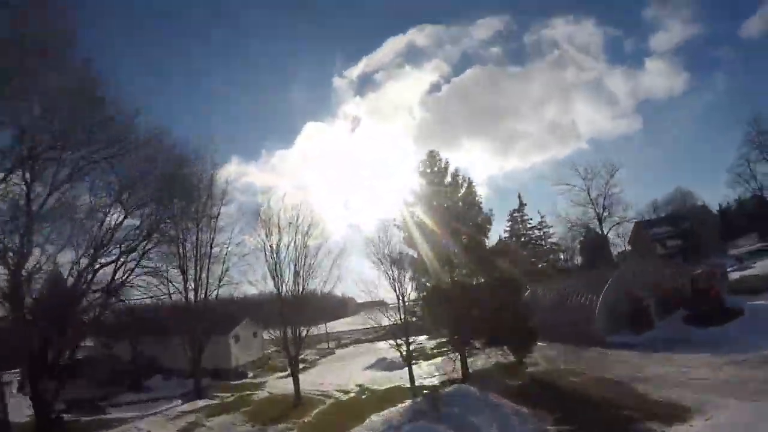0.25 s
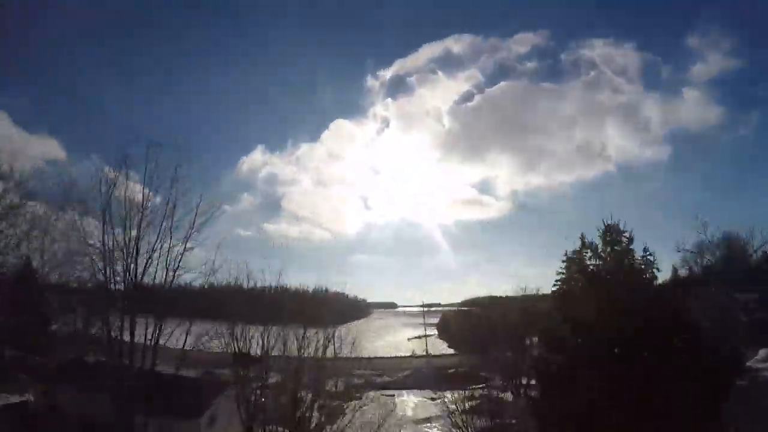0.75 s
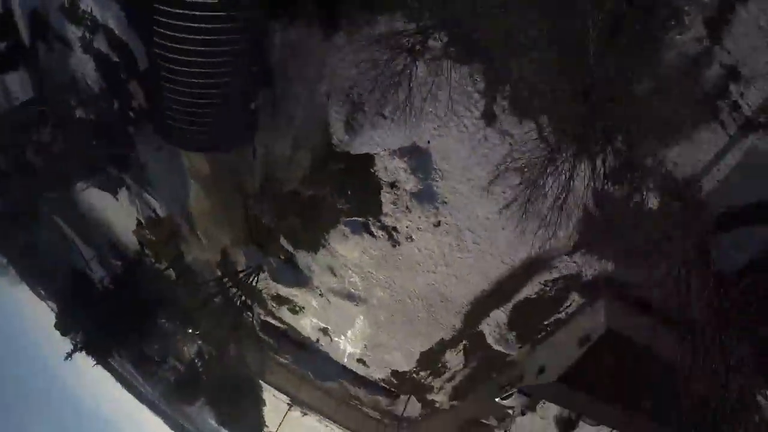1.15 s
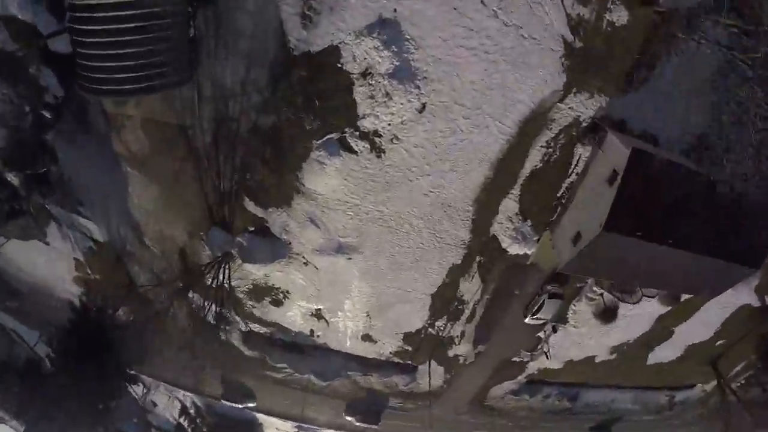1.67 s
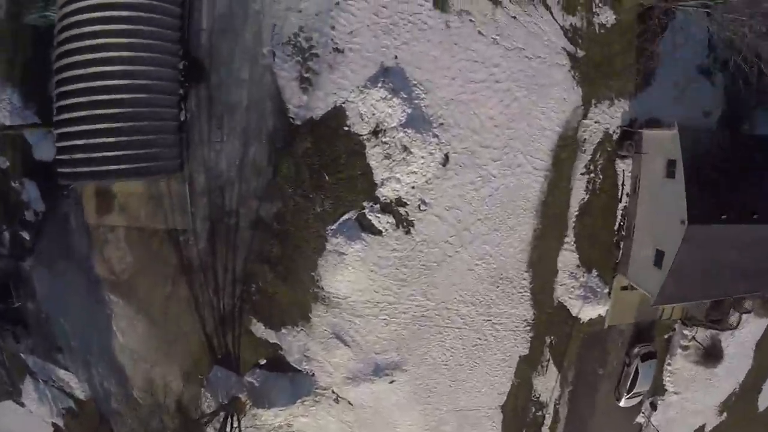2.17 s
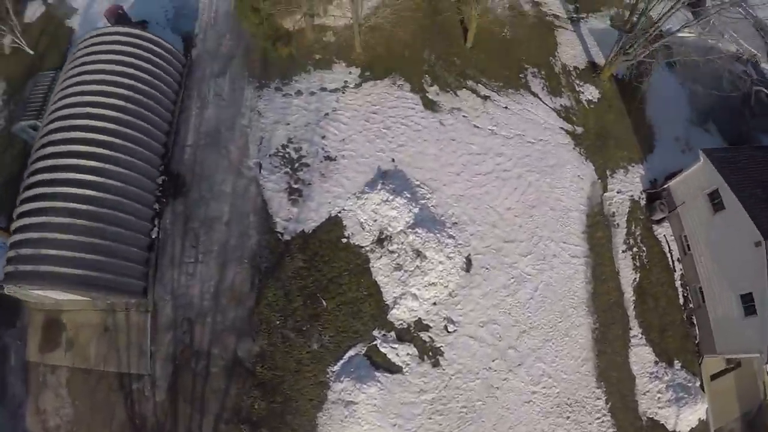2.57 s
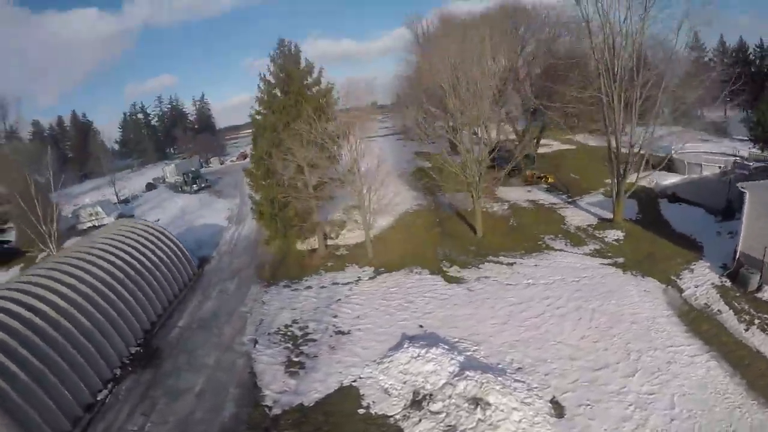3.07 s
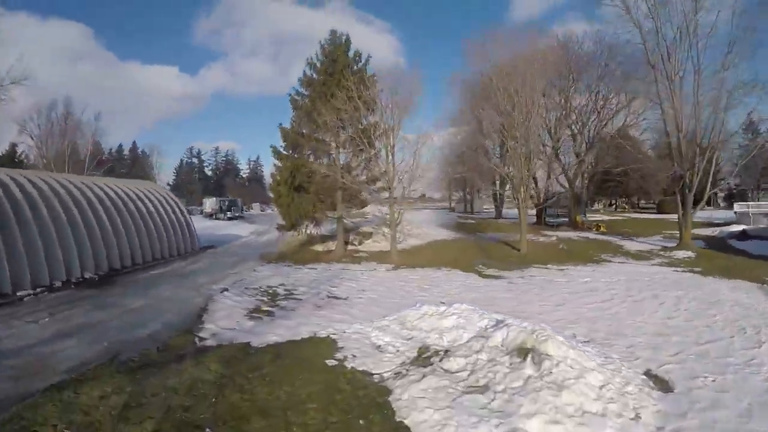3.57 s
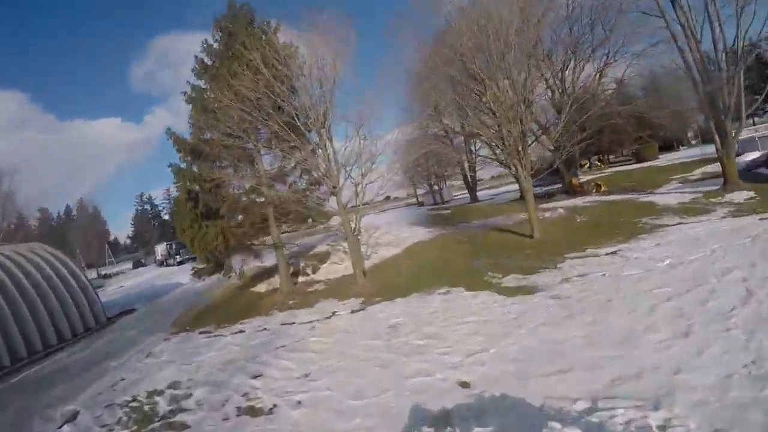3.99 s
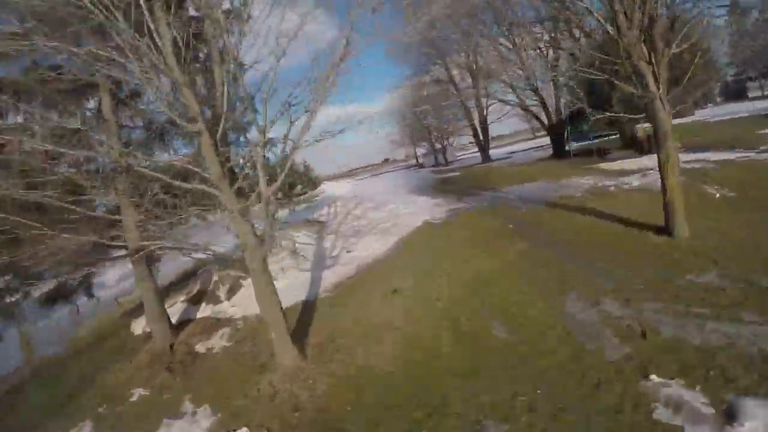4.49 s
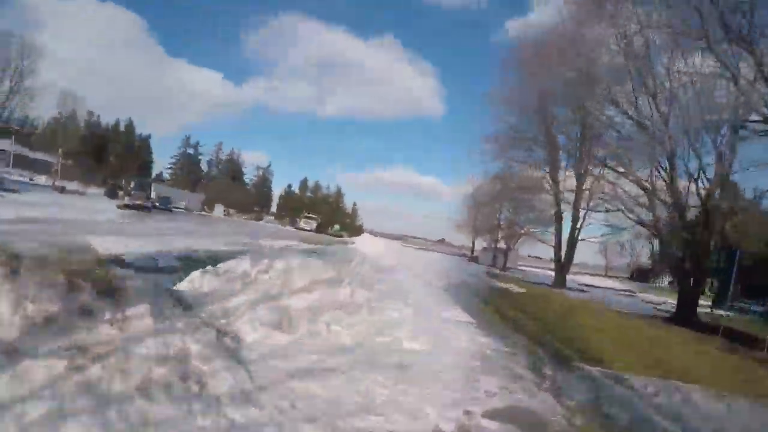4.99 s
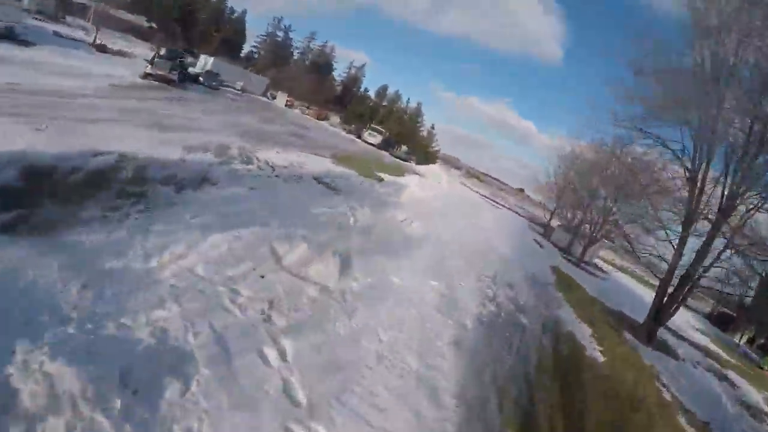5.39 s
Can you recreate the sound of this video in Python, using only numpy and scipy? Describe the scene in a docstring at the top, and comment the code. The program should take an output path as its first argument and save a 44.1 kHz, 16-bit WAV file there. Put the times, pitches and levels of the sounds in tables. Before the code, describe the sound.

A small racing drone flies outdoors, heard from a microphone riding on it. Its propellers start with a high, steady, beating whine, then drop to a low buzz while wind rumbles and slaps against the microphone. The motors climb again through the hardest gusts and a few brief crackles. The wind eases, and the whine dives, shoots back up, dips and starts rising once more.

```python
"""The propellers of a small racing drone, heard by the camera strapped to it. Each radiates harmonics of
its blade rate: two in front whine and beat against each other, a rear one sings faintly below them.
The throttle is cut for a flip and a dive, then the motors are punched down and up. Turbulent air adds
rumble, buffeting, slaps, crackles and hiss, and the loudest gusts overload the recorder."""
import sys
import numpy as np
from scipy import signal
from scipy.io import wavfile
from scipy.ndimage import uniform_filter1d

SR = 44100
rng = np.random.default_rng(int(sys.argv[2]) if len(sys.argv) > 2 else 0)


def log_audio(samples):
    """Write samples as a 16-bit WAV file to the path given in sys.argv[1]."""
    # one column per channel
    frames = np.atleast_2d(samples).T
    # limit to full scale, then quantise
    limited = np.clip(frames, -1, 1)
    pcm = np.round(limited * 32767).astype(np.int16)
    wavfile.write(sys.argv[1], SR, pcm)


N = 248900
STEP = 64  # samples between control values

# Shapes of the noise spectra: (frequency [Hz], relative spectral density [dB])
FLOOR_SPECTRUM = [(290, -31), (500, -29), (863, 3), (982, -8), (1310, 24), (2360, -25), (3190, -17),
                  (5430, -62), (7560, -37), (8980, -61), (11000, 3), (14600, -25), (15500, -51)]
RUMBLE_SPECTRUM = [(12, -15), (25, -0.5), (45, 3.5), (70, -1.5), (110, -1.5), (200, -13.5), (330, -25),
                   (600, -53), (1200, -80)]
BUFFET_SPECTRUM = [(30, -20), (80, 0), (150, 0.5), (300, -7), (600, -13.5), (1200, -26.5), (2500, -43.5),
                   (6000, -70)]
HISS_SPECTRUM = [(200, -7), (600, -0.5), (1200, -4.5), (1500, -1.5), (1800, -5), (2500, -2.5), (4200, 1.5),
                 (5000, -2), (6500, -1), (8500, -3), (11000, -5), (13000, -10.5), (15500, -12.5)]
DOWNWASH_SPECTRUM = [(90, -20), (150, 3), (230, 2), (320, -8), (420, -10.5), (700, -46)]
# Strength of the wind: (time [s], rumble [dB], buffeting [dB], turbulent hiss [dB])
WIND_LEVELS = [(0, -18, -22.5, -30.5), (.6, -17.5, -26.5, -30.5), (.85, -20, -35, -29.5),
               (1.04, -15, -22, -30), (1.07, -15, -20, -22.5), (1.15, -14.5, -15, -21),
               (1.19, -20, -14, -32.5), (1.42, -30, -12.5, -41), (1.68, -29, -19, -41.5),
               (1.9, -22.5, -19.5, -38), (2.1, -21, -19, -35), (2.2, -23, -17, -34.5),
               (2.34, -20, -15, -36), (2.5, -26, -11.5, -37.5), (2.75, -16, -14, -44), (2.8, -14, -18, -37),
               (2.84, -18.5, -13.5, -45), (2.95, -10.5, -16.5, -38), (3.03, -18, -12.5, -28),
               (3.1, -16, -12.5, -24.5), (3.2, -13, -11, -29), (3.27, -13.5, -15.5, -18.5),
               (3.36, -14.5, -16, -24.5), (3.53, -25, -23.5, -34), (3.69, -35, -52, -45),
               (3.95, -23, -38, -54), (4.06, -27, -39, -35), (4.19, -28, -37, -43.5), (4.3, -37, -40, -68),
               (4.52, -31, -40, -52), (4.67, -25.5, -27.5, -39), (4.86, -15.5, -22.5, -50),
               (5.17, -21, -26.5, -31), (5.34, -18.5, -25.5, -35.5), (5.64, -21, -21, -35)]
# Low gusts that swell the rumble: (time [s], gain [dB])
RUMBLE_GUSTS = [(0, 7.5), (0.352, 1.5), (.71, 8.5), (.77, 11), (1.38, 8), (1.96, 11), (2.092, 1), (2.46, 6),
                (2.84, 4), (3.17, 5), (4.04, 4.5), (4.38, 14), (4.48, 9), (4.619, 6), (4.729, 7),
                (4.86, 1.5), (5.2, 6), (5.42, 2.5), (5.52, -5)]
# Brightness of the buffeting: (time [s], tilt [dB/octave])
BUFFET_BRIGHTNESS = [(0, -4.5), (.7, -3.5), (1.05, 1.5), (1.3, .5), (1.7, 2.5), (2.2, 2.5), (2.6, 1),
                     (2.9, -1), (3.2, 1.5), (3.52, 4), (3.7, -5), (5.64, -0.5)]
# Single gusts striking the microphone: (time [s], envelope peak [dB], frequency [Hz])
GUST_SLAPS = [(1.124, -4.5, 458), (1.252, -14, 275), (1.333, 0.5, 334), (1.419, -4, 368), (1.464, -3, 250),
              (2.194, -9, 348), (2.276, -13, 439), (2.387, -15, 315.2), (2.588, -2.5, 464.4),
              (2.692, -13, 257), (2.817, 2, 269), (2.878, 0, 341), (2.93, -6.5, 343.7), (2.996, 0, 267),
              (3.088, -8, 262.8), (3.182, 6.5, 265.4), (3.23, -2, 249), (3.24, 0, 826), (3.267, -2.5, 293),
              (3.335, 6, 294), (3.396, -6, 248.8), (3.409, -5.5, 249.8), (3.454, -9, 876)]
# Bright bursts in the turbulence: (time [s], approximate peak [dB], duration [s])
CRACKLE_BURSTS = [(3.27, -14, 0.0084), (3.305, -9, 0.0048), (3.364, -0.5, 0.0053), (3.418, -12, 0.0063),
                  (3.4435, -20, 0.0081)]
# Response of the camera housing to the blade harmonics: (frequency [Hz], gain [dB])
HOUSING_RESPONSE = [(150, -2), (400, 0), (800, -0.5), (1100, -0.5), (1600, 0), (2200, 0), (2900, 2),
                    (3400, -4.5), (3900, 0.5), (4400, 4), (5000, 1.5), (6500, -0.5), (8000, -4)]
# Speed of the rear propeller: (time [s], blade rate over the front mean [ratio])
REAR_SPEED_RATIO = [(0, .76), (.5, .773), (.95, .862), (3.6, .8), (3.7, .83), (4.65, .81), (4.77, .77),
                    (4.95, .822), (5.1, .8), (5.35, .82), (5.65, .79)]
# Throttle of front propellers A and B: (time [s], blade rate [Hz], base tone level [dB])
THROTTLE_A = [(0, 983, -11.5), (.13, 1072, -14), (.35, 1088, -14.5), (.5, 1081, -14.5), (.64, 1088, -15),
              (.78, 1097, -14.5), (.88, 1095, -26), (.94, 1106, -20), (.98, 1087, -23.5),
              (1.035, 1170, -19), (1.085, 719.4, -24), (1.12, 461, -15), (1.2, 266.2, -30),
              (1.25, 200, -12), (1.55, 187.4, -20.5), (1.65, 159, -22.5), (1.75, 133.7, -24),
              (2.0, 114.1, -23.5), (2.15, 116, -19), (2.45, 100.9, -18.5), (2.6, 111.3, -17.5),
              (2.75, 113, -21.5), (2.88, 162, -12), (2.95, 228, -33), (3.05, 399.5, -19), (3.15, 547, -27),
              (3.25, 822, -36), (3.42, 989, -27.5), (3.48, 1042, -32), (3.54, 1053, -33.5),
              (3.6, 1055, -28), (3.66, 1033, -24), (3.72, 1041, -24.5), (3.78, 916.4, -19),
              (3.86, 734, -25.5), (3.97, 792.5, -25.5), (4.07, 641, -17.5), (4.17, 382.8, -35),
              (4.25, 235, -32.5), (4.38, 174.4, -31.5), (4.46, 197.8, -26.5), (4.55, 227, -32),
              (4.62, 719.5, -23.5), (4.66, 840.4, -19), (4.71, 884.5, -21), (4.78, 816, -20.5),
              (4.94, 1025, -16), (5.05, 906, -21.5), (5.2, 640.5, -25), (5.27, 507.2, -26),
              (5.34, 444.6, -34), (5.41, 405, -19), (5.47, 460, -20), (5.53, 551.8, -16),
              (5.58, 714, -19.5), (5.65, 790, -22.5)]
THROTTLE_B = [(0, 998, -29), (.06, 1037, -19), (.22, 1022, -17), (.35, 1019, -19), (.5, 1026, -20),
              (.64, 1050, -18.5), (.78, 1088, -21), (.88, 1078, -13.5), (.94, 1050, -14.5),
              (.97, 1021, -14.5), (.995, 1020, -15.5), (1.035, 724, -16.5), (1.085, 754, -28),
              (1.12, 819, -26), (1.16, 659, -21), (1.25, 187, -33), (3.1, 475, -67), (3.25, 761, -25),
              (3.35, 798, -36), (3.42, 868.6, -23), (3.54, 881, -24), (3.6, 954, -20), (3.66, 973, -20),
              (3.72, 989, -19), (3.81, 809, -31), (3.86, 718.5, -28.5), (3.91, 759, -25.5),
              (3.97, 782, -42), (4.17, 378.2, -34), (4.38, 174.2, -44), (4.55, 223.1, -36),
              (4.59, 437, -15), (4.62, 669, -12), (4.66, 800, -13), (4.71, 823, -13), (4.78, 773.6, -14.5),
              (4.94, 983.5, -13), (5.05, 875, -16), (5.2, 599.5, -21), (5.27, 493, -20.5),
              (5.34, 438, -17.5), (5.41, 404.4, -33), (5.47, 440.3, -23), (5.53, 517, -26.5),
              (5.58, 629, -14), (5.65, 728, -14)]
# Front harmonics, one row each from the fundamental up: (gain of A [dB], gain of B [dB])
FRONT_HARMONICS = [(0, -2), (-12, -13.5), (-13.5, -20), (-20.5, -25), (-28, -31), (-28, -37),
                   (-31.5, -34.5), (-31, -37)]
# Front timbre; lift raises all overtones, bite tilts those above the second harmonic:
# (time [s], lift of A [dB], lift of B [dB], bite [dB/octave], blade hiss at a 1000 Hz blade rate [dB])
FRONT_TIMBRE = [(0, -4, 0, 6.5, -26), (.25, -4.5, -6, 4.5, -29.5), (.5, -1, -6, 0.5, -29),
                (.64, -1, -1.5, 1.5, -29), (.8, -1.5, 5.5, 3, -27.5), (.97, 0, -3.5, -0.5, -27.5),
                (1.04, -6, 0, 0, -35.5), (1.12, -3, 5, -3, -26.5), (1.25, -5, -9, -10, -39),
                (1.45, 8, -3, -13.5, -35), (2.4, 10, -4, 2, -24), (2.9, 7, 0, -15, -29.5),
                (3.15, 2.5, -3, -4, -26), (3.25, 7, 5, -2, -26.5), (3.38, 5, 0, -11, -27.5),
                (3.48, 6.5, -4, -1, -30), (3.68, 3.5, 4, 6, -30), (3.85, -3.5, 2, 5.5, -28),
                (4.0, 5, 11, 2, -26), (4.07, -18, 0, 11, -26.5), (4.2, -11, -1, 2, -28.5),
                (4.53, -8, 2, -14, -24), (4.63, 7.5, -7, -9, -21.5), (4.78, 4, -11, -3.5, -22.5),
                (4.95, 1.5, -1.5, 3.5, -26.5), (5.1, -0.5, -14, 1, -25.5), (5.3, -3.5, -4.5, 6, -30),
                (5.5, -3, -2, -7, -22), (5.65, 4, -5, -1, -22.5)]
# Further tilt of propeller B: (time [s], bite [dB/octave])
EXTRA_BITE_B = [(0, -2), (.7, -1.5), (.95, 3), (1.04, 6), (1.15, 2), (3.5, 4), (3.75, 0), (4.5, 4),
                (4.7, 13), (4.95, 3.5), (5.15, 2), (5.65, -3)]


def gain_of(db):
    """Amplitude ratio of a level in decibels."""
    return 10 ** (np.asarray(db) / 20)


def unit_rms(x):
    """The signal normalised to unit mean power."""
    return x / np.sqrt(np.mean(x ** 2) + 1e-20)


def curves(rows, t):
    """Linear interpolation of a table's columns at the times t."""
    times, *columns = np.transpose(rows)
    return [np.interp(t, times, column) for column in columns]


def per_sample(control):
    return np.interp(np.arange(N) / STEP, np.arange(len(control)), control)


def drift(rate_hz):
    """Slow random fluctuation: low-passed noise of unit rms at the control rate."""
    lowpass = signal.butter(2, rate_hz, fs=SR / STEP)
    return unit_rms(signal.lfilter(*lowpass, rng.standard_normal(N // STEP + 2)))


def throttle(rows, t):
    """Blade rate [Hz] on a monotone cubic in log frequency, and tone level [dB] in straight lines."""
    times, hz, db = np.transpose(rows)
    gaps, pitch = np.diff(times), np.log(hz)
    chord = np.diff(pitch) / gaps
    before, after = np.append(chord[0], chord), np.append(chord, chord[-1])
    slope = np.where(before * after > 0, 2 * before * after / (before + after + 1e-12), 0)
    k = np.clip(np.searchsorted(times, t) - 1, 0, len(gaps) - 1)
    u = np.clip((t - times[k]) / gaps[k], 0, 1)
    ease = u * u * (3 - 2 * u)
    bend = gaps[k] * u * (1 - u) * ((1 - u) * slope[k] - u * slope[k + 1])
    return np.exp(pitch[k] + ease * chord[k] * gaps[k] + bend), np.interp(t, times, db)


def speed_octaves(t):
    """Blade rate of the faster front propeller, in octaves above 1000 Hz."""
    return np.log2(np.maximum(throttle(THROTTLE_A, t)[0], throttle(THROTTLE_B, t)[0]) / 1000)


def shaped_noise(spectrum, size, patchy_db, flicker_db, tilt_db=(0,), pivot_hz=1000):
    """Gaussian noise modulated by spectral patches, broadband flicker and a tilt in dB per octave."""
    hop = size // 4
    frames, hz = N // hop + 5, np.fft.rfftfreq(size, 1 / SR)
    real, imag, patches = rng.standard_normal((frames, len(hz), 3)).T
    patches = unit_rms(uniform_filter1d(uniform_filter1d(patches, size=6, axis=0), size=8, axis=1))
    flicker = unit_rms(uniform_filter1d(rng.standard_normal(frames), size=3))
    points_hz, points_db = np.transpose(spectrum)
    colour_db = np.interp(np.log(hz + 1), np.log(points_hz), points_db, left=-60, right=-120)[:, None]
    untilted = (real + 1j * imag) * gain_of(colour_db + patchy_db * patches + flicker_db * flicker)
    octaves = np.log2(np.maximum(hz[:, None] / pivot_hz, .3))
    frame_tilt_db = np.take(tilt_db, np.arange(frames) * hop // STEP, mode="clip")
    tilted = untilted * gain_of(octaves * frame_tilt_db)
    sound = signal.istft(tilted, nperseg=size, noverlap=size - hop)[1][:N]
    return unit_rms(sound) * np.linalg.norm(tilted) / np.linalg.norm(untilted)


def noise_floor():
    """Stationary background noise of the microphone and housing."""
    return gain_of(-53.5) * shaped_noise(FLOOR_SPECTRUM, size=512, patchy_db=1.5, flicker_db=1)


def wind(t, gust_half_width_s=0.023):
    """Pressure fluctuations of eddies at the microphone: a gusty low rumble and lumpy buffeting."""
    rumble_db, buffet_db, _ = curves(WIND_LEVELS, t)
    rumble_db += sum(db * np.exp(-((t - s) / gust_half_width_s) ** 2) for s, db in RUMBLE_GUSTS)
    rumble = shaped_noise(RUMBLE_SPECTRUM, size=2048, patchy_db=-2.37, flicker_db=0.56)
    buffet = shaped_noise(BUFFET_SPECTRUM, size=512, patchy_db=0.9, flicker_db=1.5,
                          tilt_db=curves(BUFFET_BRIGHTNESS, t)[0], pivot_hz=230)
    return per_sample(gain_of(rumble_db)) * rumble + per_sample(gain_of(buffet_db)) * buffet


def slaps(cycles=1.38):
    """Transient forcing: a gust pushes the microphone membrane through a swing or two."""
    out = np.zeros(N)
    for start_s, db, hz in GUST_SLAPS:
        phase = np.arange(0, cycles, hz / SR)
        envelope = np.sin(np.pi * (phase / cycles) ** 0.47)  # sudden start
        out[round(start_s * SR):][:len(phase)] += gain_of(db) * envelope * np.sin(2 * np.pi * phase)
    return out


def crackles(crest_factor=5.9):
    """Intermittent turbulence: bursts of bright noise that swell and die within milliseconds."""
    bandpass = signal.butter(2, [1200, 5000], "band", fs=SR)
    fizz = unit_rms(signal.lfilter(*bandpass, rng.standard_normal(N)))
    envelope = np.zeros(N)
    for start_s, db, length_s in CRACKLE_BURSTS:
        u = np.arange(0, 1, 1 / (length_s * SR))
        envelope[round(start_s * SR):][:len(u)] += gain_of(db) * np.sin(np.pi * u ** 0.78)
    return envelope * fizz / crest_factor


def hiss_and_downwash(t, rise_db_per_octave=9, spool_octaves_per_s=22):
    """Incoherent blade and eddy noise add in power; the downwash over the camera follows their sum."""
    speed = speed_octaves(t)
    acceleration = np.maximum(np.gradient(speed, t), 0)
    spool_db = 6.5 * np.tanh(acceleration / spool_octaves_per_s)  # accelerating blades hiss harder
    blade_power = gain_of(curves(FRONT_TIMBRE, t)[3] + rise_db_per_octave * speed + spool_db) ** 2
    eddy_power = gain_of(curves(WIND_LEVELS, t)[2]) ** 2
    power = blade_power + eddy_power
    blade_tilt_db, eddy_tilt_db = 0.2 + 2.8 * speed, -5.5  # per octave of frequency
    tilt_db = (blade_power * blade_tilt_db + eddy_power * eddy_tilt_db) / power
    hiss = shaped_noise(HISS_SPECTRUM, size=256, patchy_db=-0.07, flicker_db=1,
                        tilt_db=tilt_db, pivot_hz=2700)
    downwash = shaped_noise(DOWNWASH_SPECTRUM, size=1024, patchy_db=4.3, flicker_db=0.6)
    return per_sample(np.sqrt(power)) * (hiss + gain_of(-3) * downwash)


def propeller(blade_hz, tone_db, harmonics_db, lift_db=0, bite_db=0):
    """Periodic passage of three blades radiates a harmonic series; unsteady inflow makes it waver."""
    inertia_steps = SR // STEP // 100  # rotor inertia rounds off speed changes
    blade_hz = uniform_filter1d(uniform_filter1d(blade_hz, inertia_steps), inertia_steps)
    blade_phase = 2 * np.pi * np.cumsum(per_sample(blade_hz)) / SR + per_sample(.035 * drift(rate_hz=40))
    shaft_phase = blade_phase / 3
    fourth_shaft_order = gain_of(-31.5) * np.cos(4 * shaft_phase)
    unbalance = gain_of(-27.5) * (np.cos(shaft_phase) + np.cos(2 * shaft_phase) / 2)
    out = per_sample(gain_of(tone_db)) * (fourth_shaft_order + unbalance)
    housing_hz, housing_db = np.transpose(HOUSING_RESPONSE)
    for order, db in enumerate(harmonics_db, 1):
        waver_db = (1 + order / 5) * drift(rate_hz=20)
        timbre_db = lift_db * (order >= 2) + bite_db * max(np.log2(order / 2), 0)
        colour_db = np.interp(np.log(order * blade_hz), np.log(housing_hz), housing_db)
        amplitude = gain_of(tone_db + db + timbre_db + colour_db + waver_db)
        out -= per_sample(amplitude) * np.cos(order * blade_phase)
    return np.sqrt(2) * out


def drone(t):
    """Two front propellers beat at the difference of their blade rates, over a faint, slower rear one."""
    a_hz, a_db = throttle(THROTTLE_A, t)
    b_hz, b_db = throttle(THROTTLE_B, t)
    a_lift_db, b_lift_db, bite_db, _ = curves(FRONT_TIMBRE, t)
    a_harmonics_db, b_harmonics_db = np.transpose(FRONT_HARMONICS)
    front_a = propeller(a_hz, a_db, a_harmonics_db, a_lift_db, bite_db)
    front_b = propeller(b_hz, b_db, b_harmonics_db, b_lift_db, bite_db + curves(EXTRA_BITE_B, t)[0])
    rear_hz = curves(REAR_SPEED_RATIO, t)[0] * (a_hz + b_hz) / 2
    rear_db = -40 + 9 * speed_octaves(t)
    return front_a + front_b + propeller(rear_hz, rear_db, harmonics_db=[0, -9])


def scene():
    """Superposition in open air at one microphone on the airframe."""
    t = np.arange(N // STEP + 2) * STEP / SR
    return (drone(t) + wind(t) + hiss_and_downwash(t) + noise_floor() + slaps() + crackles())[None]


def record(dry):
    """Soft saturation near full scale, followed by the recorder's band limit."""
    ceiling, knee, cutoff_hz = .95, 10, 15290
    saturated = dry / (1 + abs(dry / ceiling) ** knee) ** (1 / knee)
    lowpass = signal.firwin(1023, cutoff_hz, window=("kaiser", 9), fs=SR)
    return signal.oaconvolve(saturated, lowpass[None], "same")


dry = scene()
out = record(dry)
log_audio(out)
```